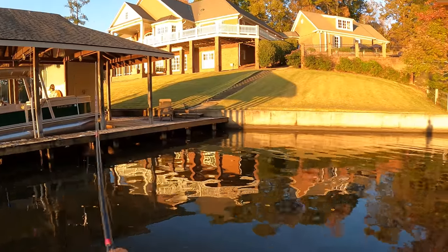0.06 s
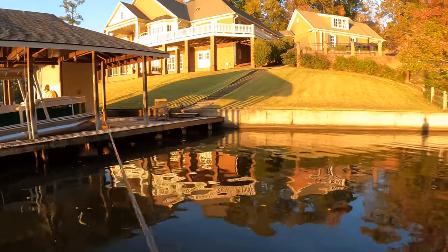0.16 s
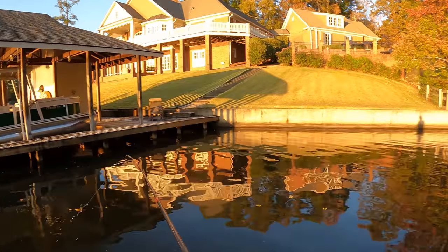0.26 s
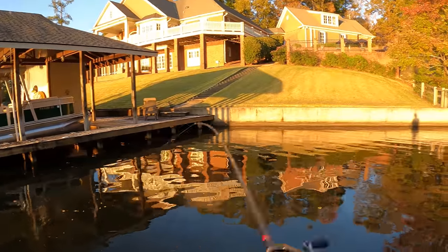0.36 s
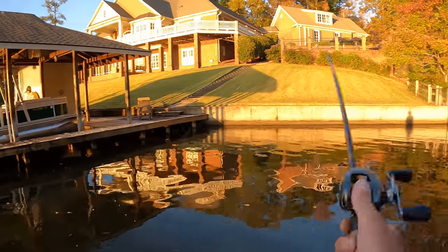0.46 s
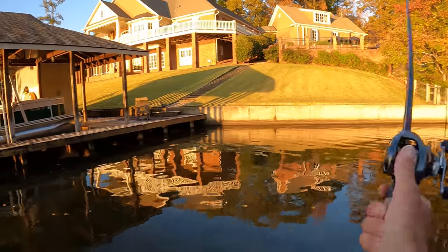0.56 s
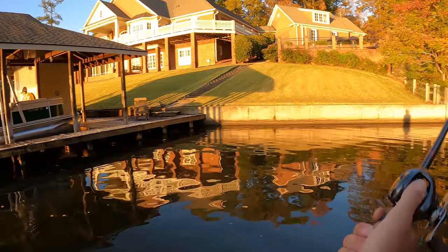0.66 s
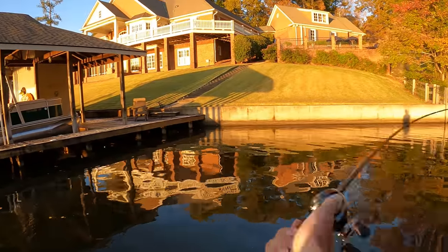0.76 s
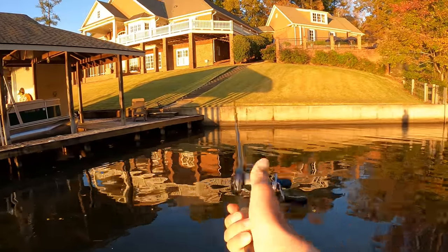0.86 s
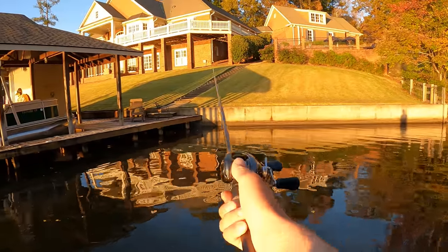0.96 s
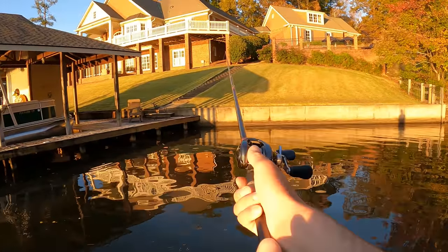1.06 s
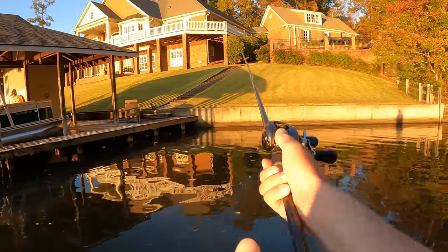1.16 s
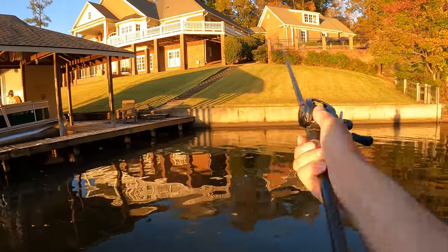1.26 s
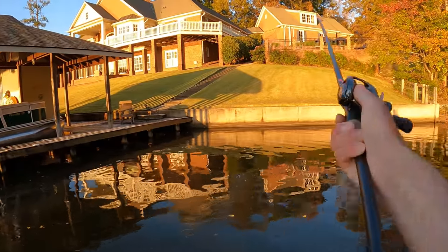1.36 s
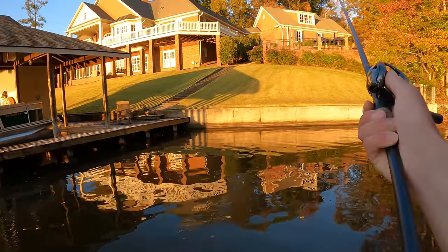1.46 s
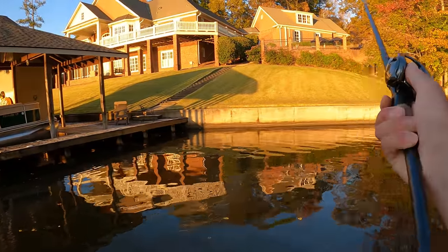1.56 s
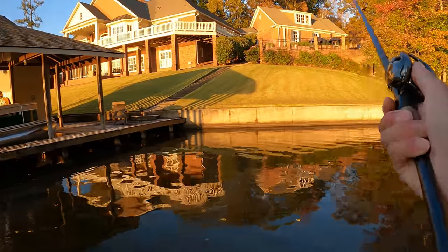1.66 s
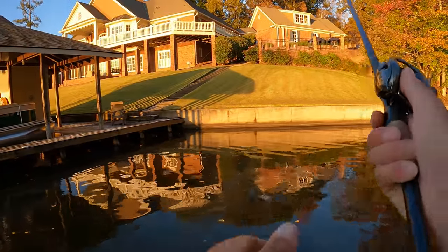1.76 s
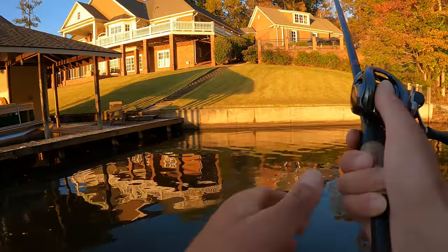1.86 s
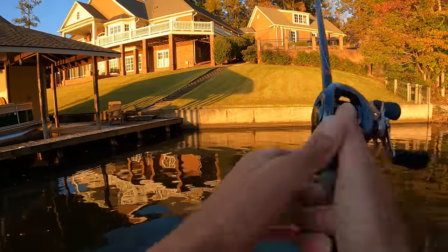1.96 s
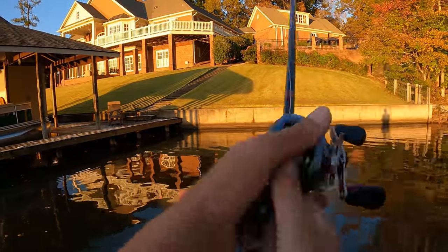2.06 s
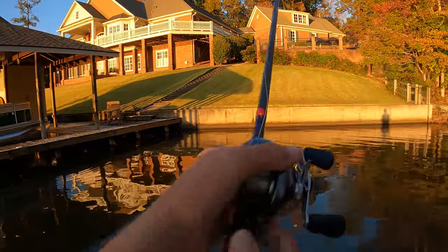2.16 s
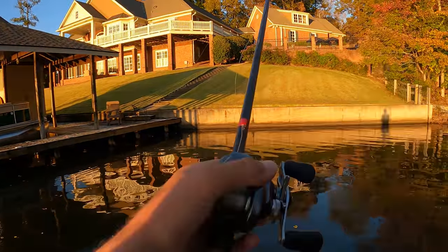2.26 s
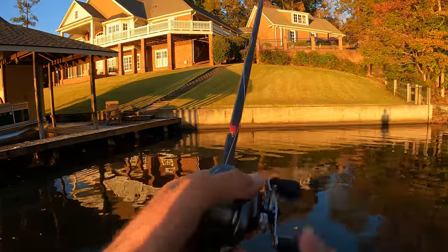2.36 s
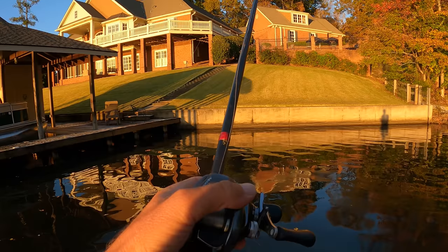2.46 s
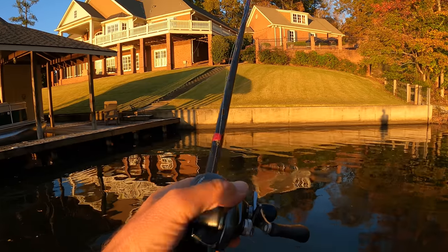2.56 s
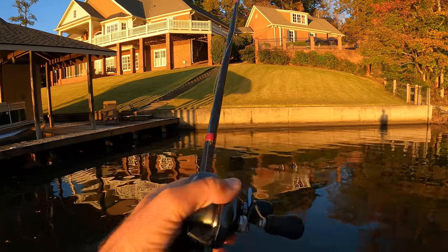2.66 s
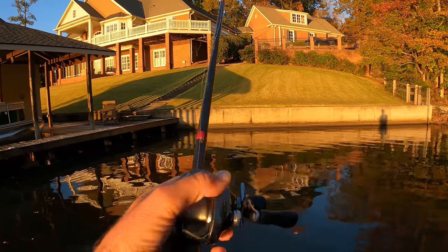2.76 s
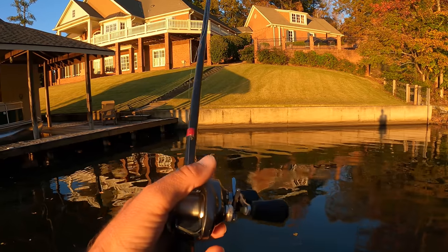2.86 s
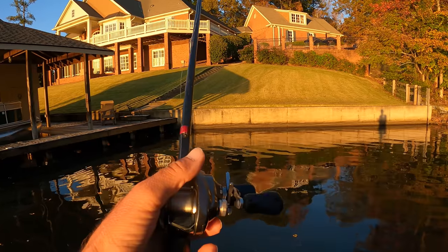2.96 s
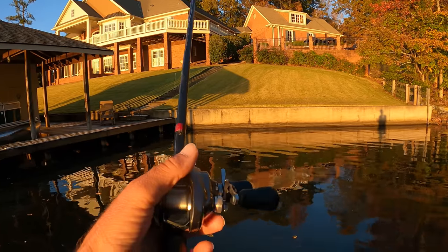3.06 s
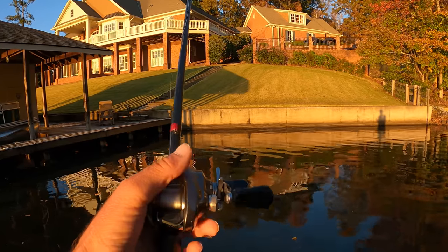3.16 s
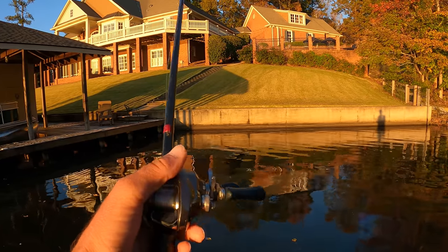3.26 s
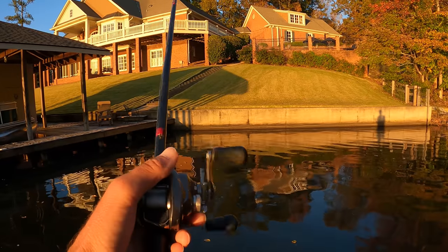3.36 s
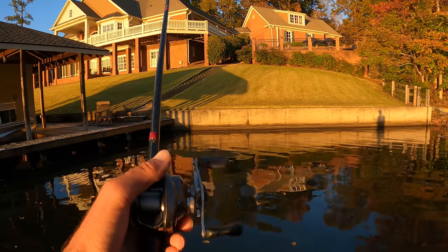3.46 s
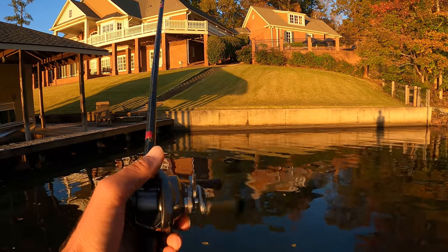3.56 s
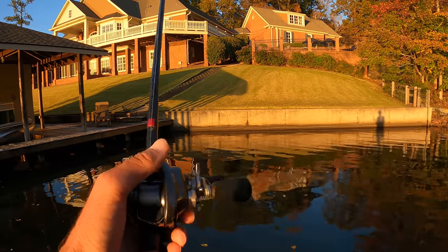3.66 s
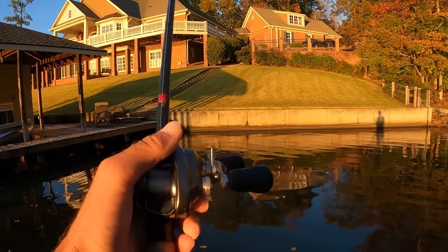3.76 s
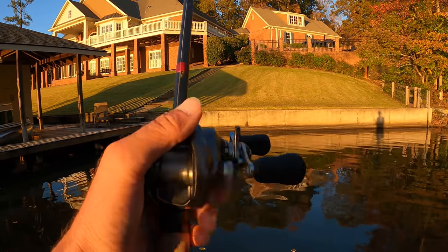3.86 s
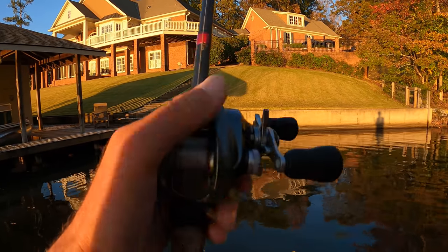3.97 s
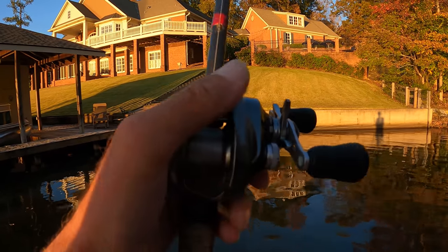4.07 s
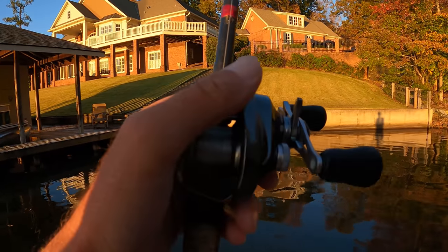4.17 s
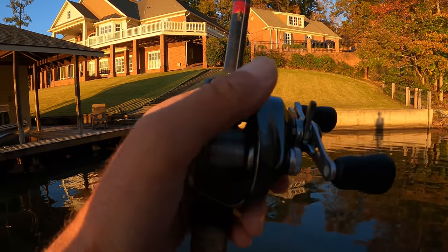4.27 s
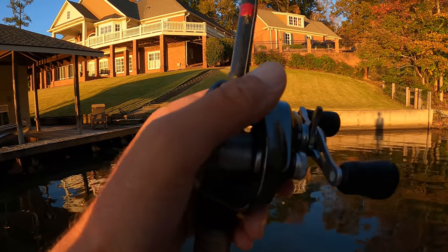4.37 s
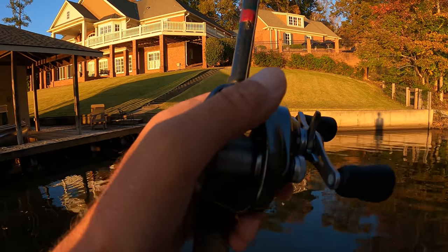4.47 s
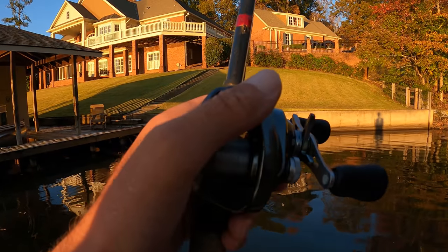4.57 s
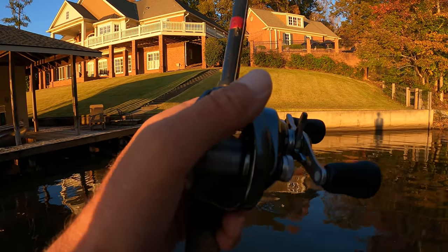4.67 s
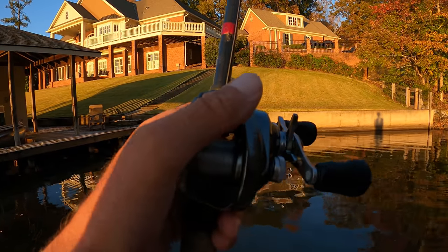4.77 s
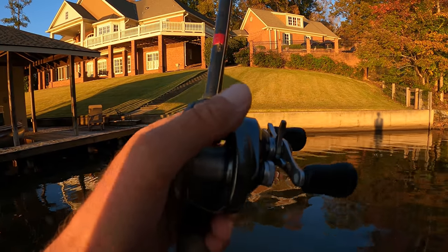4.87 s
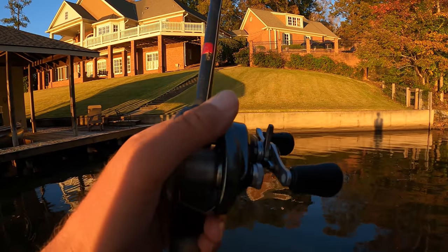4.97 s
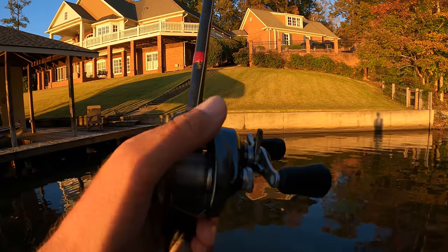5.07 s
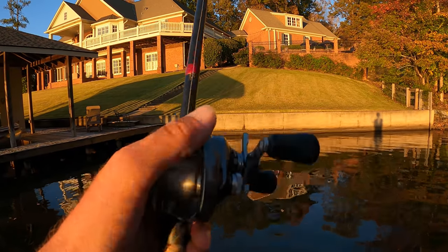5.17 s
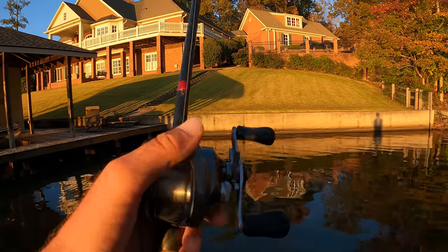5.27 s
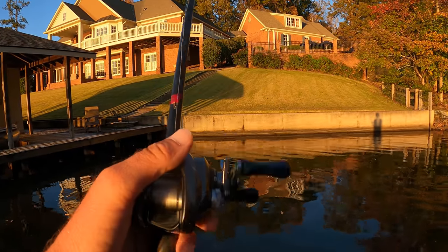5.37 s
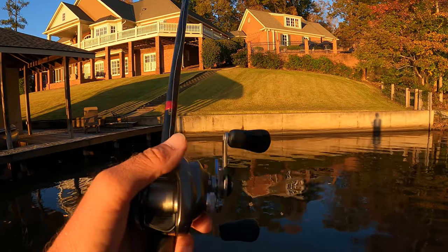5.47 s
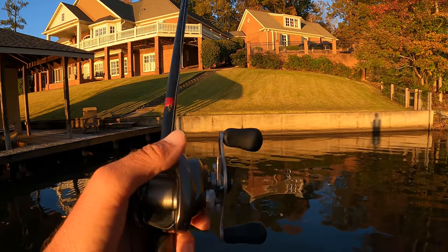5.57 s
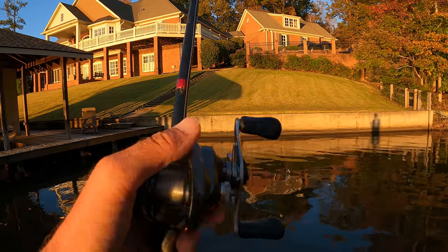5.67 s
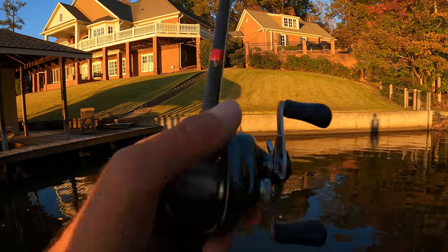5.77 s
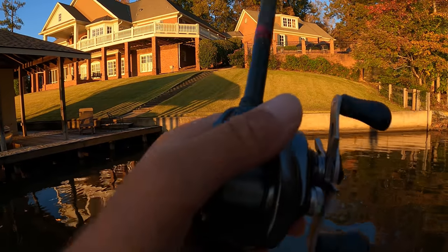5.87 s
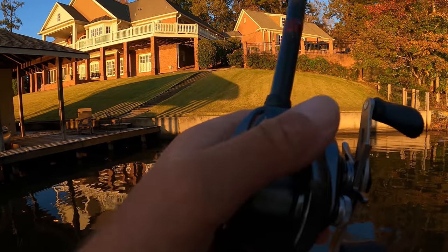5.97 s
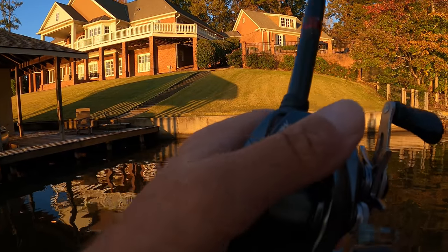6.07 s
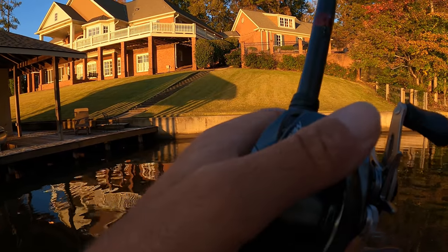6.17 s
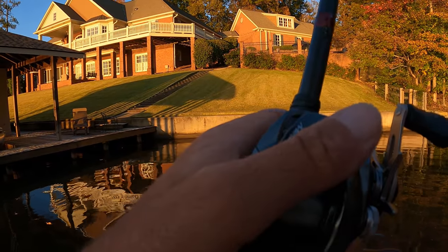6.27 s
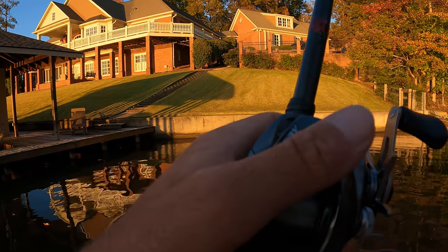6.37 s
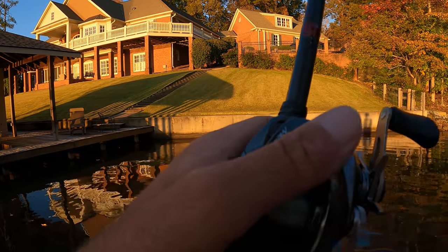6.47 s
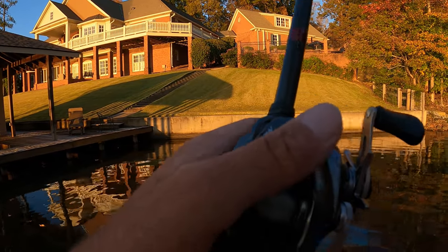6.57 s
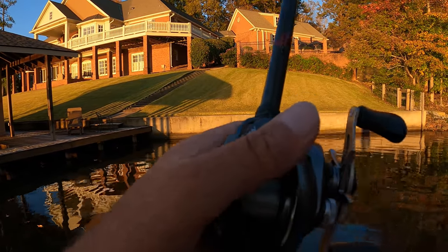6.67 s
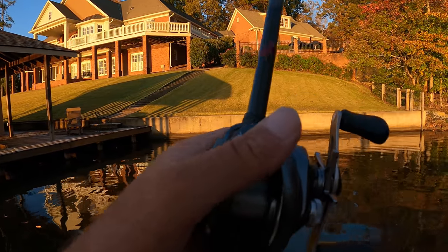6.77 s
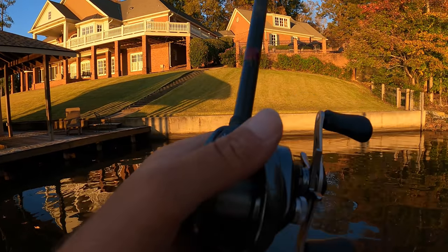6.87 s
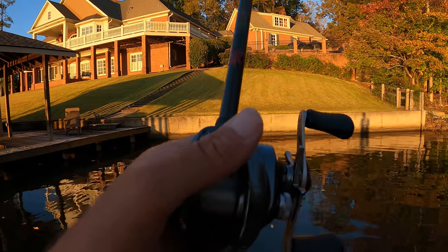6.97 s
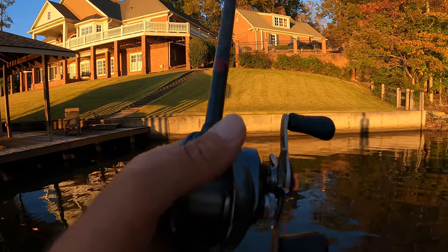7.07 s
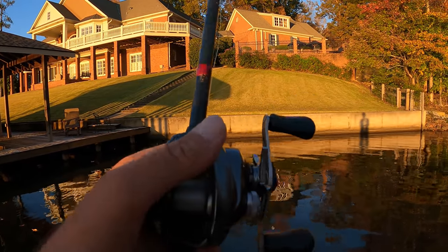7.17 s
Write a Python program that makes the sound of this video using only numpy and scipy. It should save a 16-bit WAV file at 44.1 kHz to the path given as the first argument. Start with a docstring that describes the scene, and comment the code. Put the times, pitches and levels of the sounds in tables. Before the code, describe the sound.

A fishing cast at close range: arm thuds, clack, bright whir falling in pitch, sharp reel click, then soft winding and dull bumps on quiet water.

```python
"""A cast with a baitcasting reel from a boat on a quiet cove, heard close by; air, water and crickets are shaped noise and tones.
Arm movements thud as low noise; then the thumb bar clacks as a burst of damped modes.
The spool whirs up and slows as harmonics of its turning, with rasp, whistles and the hiss of line.
The handle snaps the gears in: bursts of noise ring the frame, and the gears whir softly now and then.
Water laps under the hull, near crickets trill, and late bumps on the rod sound as dull damped resonances."""
import sys
import numpy as np
from scipy import signal
from scipy.fft import rfft, irfft, next_fast_len
from scipy.io import wavfile
from scipy.ndimage import uniform_filter1d, map_coordinates

SR = 44100
rng = np.random.default_rng(int(sys.argv[2]) if len(sys.argv) > 2 else 0)


def generate_wav(sig):
    """Save sig (samples, or channels by samples) to the path in sys.argv[1] as 16-bit PCM at SR."""
    pcm = np.round(np.clip(np.atleast_2d(sig).T, -1, 1) * 32767).astype(np.int16)
    wavfile.write(sys.argv[1], SR, pcm)


N = 318393
STROKE_DROP_DB = 12  # how far strokes, skid, sizzle and ticks lie below their peak at their ends


def amp(db):
    """Amplitude ratio of a level in decibels."""
    return 10 ** (np.asarray(db) / 20)


def unit(x):
    """Normalise to a root mean square of 1."""
    return x / np.sqrt(np.mean(x ** 2) + 1e-20)


def along(points, hz):
    """Interpolate (Hz, value) points on a logarithmic frequency axis."""
    f, v = np.transpose(points)
    return np.interp(np.log(hz + 1), np.log(f + 1), v)


def curves(rows):
    """Interpolate linearly in time: one value per sample for each column after the time."""
    s, *cols = np.transpose(rows)
    return [np.interp(np.arange(N) / SR, s, c) for c in cols]


def swells(rows, fade=0.04):
    """Envelope for each dB column, fading to silence outside the table's times."""
    t = np.arange(N) / SR
    gate = np.clip(1 + np.minimum(t - rows[0][0], rows[-1][0] - t) / fade, 0, 1)
    return gate * amp(curves(rows))


def swell(s, db, rise_s, fall_s, drop_db, fade=.04, tail_s=0):
    """Exponential growth to a peak at s and decay after it; drop_db lower at either end, it fades out."""
    t = np.arange(N) / SR - s
    gate = np.clip(1 + np.minimum((t + rise_s) / fade, (fall_s - t) / (fade + tail_s)), 0, 1)
    return gate * amp(db - drop_db * np.abs(t / np.where(t < 0, rise_s, fall_s)))


def wobble(rate):
    """Slow random modulation: a smooth curve through rate random knots a second."""
    knots = rng.standard_normal(int(N * rate / SR) + 4)
    return map_coordinates(knots, [np.arange(N) * rate / SR])


def filtered(x, response):
    """Linear filtering: the spectrum of x times a response of frequency."""
    m = next_fast_len(N + 8192)
    return irfft(rfft(x, m) * response(np.fft.rfftfreq(m, 1 / SR)), m)[..., :N]


def band(x, lo_hz, hi_hz, order=2):
    """Causal band-pass resonance without ripple."""
    sections = signal.butter(order, [lo_hz, min(hi_hz, SR * .45)], 'band', fs=SR, output='sos')
    return signal.sosfilt(sections, x)


def rush(spectrum):
    """Partly coherent stereo noise of rms 1: a shared middle and an independent side set the likeness."""
    # Each row: frequency in Hz, correlation of left and right from 0 to 1.
    likeness = [(50, 1), (150, 0.9), (400, 0.53), (1500, 0.54), (12000, 0.67)]

    def mid_side(hz):
        angle = np.arccos(np.clip(along(likeness, hz), -1, 1)) / 2
        return amp(along(spectrum, hz)) * [np.cos(angle), np.sin(angle)]

    mid, side = filtered(rng.standard_normal((2, N)), mid_side)
    return unit(np.array([mid + side, mid - side]))


def blow(x):
    """Scale a transient to the energy of two milliseconds at rms 1."""
    return x / np.sqrt(np.sum(x ** 2) / (.002 * SR))


def add(track, s, x):
    """Superpose x on the track from time s."""
    part = track[round(s * SR):][:len(x)]
    part += x[:len(part)]


def modes(table, t, scatter_db):
    """Modal decay: damped sines that share the energy of every blow a little differently."""
    total = 0
    for hz, level, t60 in table:
        decay = amp(level + rng.normal(0, scatter_db) - 60 * t / t60)
        total = total + decay * np.sin(2 * np.pi * hz * t)
    return total


def rotor(rate_hz, spectrum, odd_db, flutter_db, shake, count):
    """Harmonics of a turning part glide through fixed resonances; shake (radians) blurs the high ones."""
    phase = 2 * np.pi * np.cumsum(rate_hz) / SR + shake * wobble(200)[:len(rate_hz)]
    t = np.arange(len(rate_hz)) / SR
    tone = 0
    for k in range(2, count):
        flutter = np.interp(t, np.arange(64) / 20, rng.standard_normal(64))
        gain = amp(along(spectrum, k * rate_hz) + odd_db * (k % 2))
        tone = tone + gain * amp(flutter_db * flutter) * np.sin(k * phase + rng.uniform(0, 2 * np.pi))
    return unit(tone)


def whistle(speed, rows, shake):
    """Order tones: single multiples of the rotation sing for a moment; shake (radians) roughens them."""
    phase = 2 * np.pi * np.cumsum(speed) / SR + shake * wobble(110)
    t, flutter = np.arange(N) / SR, amp(4 * wobble(55))
    song = 0
    for start, end, order, db in rows:
        gate = np.clip(np.minimum(t - start, end - t) / .03, 0, 1)
        song = song + amp(db) * gate * np.sin(order * phase)
    return np.sqrt(2) * flutter * song


def cove():
    """Broadband outdoor air, and a narrow low resonance of the hull excited by lapping water."""
    # Still air. Each row: frequency in Hz, relative level in dB per Hz.
    air_spectrum = [(29, -44.5), (50, -24.5), (91, -3), (124, -12), (162, -13.5), (400, -22.5), (841, -39),
                    (1130, -29), (3300, -45.5), (5000, -100)]
    # The strongest laps under the hull. Each row: peak time in seconds, level in dB.
    lap_rows = [(4.171, -43), (4.6, -48), (4.97, -51), (5.17, -45), (5.55, -45)]
    hum = rush([(55, -36.5), (80, 13), (90, 9.0), (115, -11.5), (200, -64.5)])
    laps = sum(swell(s, db, rise_s=0.052, fall_s=0.044, drop_db=9.5) for s, db in lap_rows)
    ripples = amp(-63.5 + 2 * wobble(9.3))  # small waves between the laps
    air = amp(-57.0) * rush(air_spectrum) * amp(0.41 * wobble(3.7))
    return air + np.hypot(laps, ripples) * hum


def crickets():
    """Wing strokes modulate a tone in amplitude and frequency; near trills stand over a far chorus of noise."""
    # Far insects. Each row: frequency in Hz, relative level in dB per Hz.
    chorus_spectrum = [(2500, -40), (3500, -17), (4000, -3.5), (4350, 2), (4700, -12), (5300, -22),
                       (7200, -23.5), (8500, -32), (12000, -45.5), (15000, -72)]
    # Near trills. Each row: start in seconds, end in seconds, pitch in Hz, level in dB.
    trill_rows = [(2.158, 2.525, 4400, -62.5), (2.601, 3.016, 4115, -65.5), (2.994, 3.396, 4370, -68),
                  (3.43, 3.896, 4326, -60), (3.549, 4.142, 4045, -66.5), (4.421, 4.781, 4277, -62),
                  (4.954, 5.407, 4094, -67.5), (5.582, 6.04, 4280, -56.5), (6.293, 7.105, 4420, -61)]
    out = amp(-63.5) * rush(chorus_spectrum) * amp(0.27 * wobble(12.0))
    drift, grit, size = wobble(9.1), wobble(300), wobble(25)
    for start, end, hz, db in trill_rows:
        i = np.arange(round(start * SR), min(round(end * SR), N))
        strokes_per_s = 40 * (1 + 0.041 * drift[i])
        stroke = 2 * np.pi * np.cumsum(strokes_per_s) / SR + rng.uniform(0, 2 * np.pi)
        pitch = hz + 25 * drift[i] + 60 * np.sin(stroke) + 70 * grit[i]  # swings with each stroke
        carrier = np.sin(2 * np.pi * np.cumsum(pitch) / SR)
        trill = unit(carrier * amp(3.2 * np.cos(stroke) + 2.1 * size[i]))
        out[:, i] += amp(db) * trill * signal.windows.tukey(len(i), .5)
    return out


def handling():
    """Pressure of moving air thuds on the microphone as low noise, and the hands rumble through the rod."""
    # Air on the microphone. Each row: frequency in Hz, relative level in dB per Hz.
    rumble_spectrum = [(12, -33.5), (21, 0), (54, 8.5), (118, -16), (221, -27), (300, -32.5), (480, -120)]
    # Hands on the rod. Each row: frequency in Hz, relative level in dB per Hz.
    grip_spectrum = [(47, -24.5), (80, 5.5), (154, 1), (517, -11), (1200, -17.5), (3000, -30), (3900, -37),
                     (6600, -120)]
    # Arm movements pushing air. Each row: peak time in seconds, relative level in dB, rise and fall in seconds.
    buffet_rows = [(.04, -37.5, 0.13, 0.061), (.19, -25.5, 0.17, 0.17), (.44, -32.5, 0.041, 0.057),
                   (.83, -41.5, 0.088, 0.12), (1.359, -40.5, 0.21, 0.25), (2.26, -39.5, 0.06, 0.08),
                   (2.53, -48.5, 0.095, .06), (7.03, -39, 0.1, 0.055), (7.21, -37, 0.076, 0.086)]
    # Hands shifting on the rod. Each row: peak time in seconds, relative level in dB, rise and fall in seconds.
    grip_rows = [(.925, -44.5, 0.073, 0.056), (1.38, -57, 0.08, 0.59), (2.2, -58.5, 0.29, 0.46),
                 (2.502, -52.5, 0.085, 0.17), (4.6, -65.5, 0.19, 0.7), (5.37, -59.5, 0.033, 0.13),
                 (6.45, -61, 0.026, 0.1), (6.88, -51.5, 0.076, 0.19), (7.2, -50, 0.38, 0.093)]
    drop_db = 12.5
    breeze = amp(-59.5)  # relative, like the buffets: air between the movements
    push = breeze + sum(swell(*row, drop_db) for row in buffet_rows)
    buffet = push * rush(rumble_spectrum) * amp([[-2.2], [2.2]])  # stronger on the right
    uneven = unit(rush(grip_spectrum) * amp(2.2 * wobble(60)))
    grip = sum(swell(*row, drop_db) for row in grip_rows) * uneven
    return amp(-0.5) * buffet + amp(6.5) * grip


def rubbing():
    """Sliding friction of line, sleeve and hand: grainy noise, with a band in which taut line rings the guides."""
    # Each row: frequency in Hz, relative level in dB per Hz.
    rub_spectrum = [(350, -35), (720, -9.5), (1150, 0), (1560, -11), (1960, -7.5), (3060, -5.5),
                    (4770, -5.5), (6960, -10), (12800, -29), (15000, -43.5)]
    # Strokes. Each row: peak time in seconds, relative level in dB, rise and fall in seconds,
    # treble gain in dB, guide ring in dB relative to the grain in its band.
    stroke_rows = [(.09, -59, 0.19, 0.24, 8, 5.5), (.23, -61.5, 0.02, 0.022, 14, 12.5),
                   (.4, -64.5, 0.4, 0.11, -6, -11), (0.688, -57.5, 0.23, 0.49, 1, -8.5),
                   (2.127, -58.5, 0.071, 0.12, 1, -17), (2.563, -64, 0.0088, 0.128, 0.5, -1.5),
                   (2.962, -74.5, 0.045, 0.17, 8.5, -10), (3.425, -67, 0.053, 0.29, 1.5, -7),
                   (5.279, -55.5, 0.057, 0.31, -6, -18)]
    treble_hz = 7300
    grain = unit(rush(rub_spectrum) * amp(1.1 * wobble(400) + 1.6 * wobble(40)))
    treble = filtered(grain, lambda hz: hz ** 4 / (hz ** 4 + treble_hz ** 4))
    ring = band(grain, 1890, 2320, order=1)
    strokes = 0
    for s, db, rise_s, fall_s, treble_db, ring_db in stroke_rows:
        colour = grain + (amp(treble_db) - 1) * treble + amp(ring_db) * ring
        strokes = strokes + swell(s, db, rise_s, fall_s, STROKE_DROP_DB, tail_s=fall_s / 2) * colour
    return amp(8.0) * strokes


def knocks():
    """Soft impact: a damped resonance, a hollow thud around it, the seat's clack and the rod's after-ring."""
    # Dull bumps on rod and hull. Each row: time in seconds, level in dB, pitch in Hz,
    # then clack and thud in dB relative to that level.
    knock_rows = [(0.914, -31.5, 219, -30, -8), (2.664, -52.5, 960, -16, -1), (3.003, -42.5, 550, -17, 1),
                  (4.527, -52, 600, -14, 2), (4.574, -56, 960, -18, -2), (4.626, -52, 912, -16, 1),
                  (6.825, -39.5, 1050, -6, 2), (6.842, -29, 998, -4, -2), (6.857, -30.5, 137, -28, -2),
                  (6.863, -39.5, 700, -18, -3), (6.8805, -24, 502, -28, -12.5), (6.894, -44.5, 1140, -9, 0),
                  (7.14, -27.5, 954, -12, -2), (7.172, -36, 900, -13, 6.5)]
    # Low modes of rod and reel seat. Each row: frequency in Hz, relative level in dB, 60 dB decay time in seconds.
    rod_modes = [(301, -6, .8), (393, 0, .42), (500, -9, .2)]
    # Bright modes of the reel seat. Each row: frequency in Hz, relative level in dB, 60 dB decay time in seconds.
    seat_modes = [(1703, 3.5, 0.04), (2060, 3, 0.018), (2350, -5, 0.024), (3370, -1, 0.029),
                  (3770, 4, 0.02), (4870, 8.5, 0.018)]
    # Bar and gears set the rod ringing. Each row: time in seconds, level in dB.
    jolt_rows = [(.353, -43), (2.511, -36)]
    out, t = np.zeros(N), np.arange(SR // 2) / SR
    rise = 1 - np.exp(-t / 0.003)  # a soft contact

    def rod():
        """Modal after-ring of the rod."""
        return blow(rise * modes(rod_modes, t, scatter_db=1.4))

    for s, db, hz, clack_db, thud_db in knock_rows:
        tone = np.sin(2 * np.pi * hz * t) * rise * amp(-60 * t / 0.025)
        force = rng.standard_normal(len(t)) * rise * (amp(-60 * t / 0.017) + amp(-18.0 - 60 * t / 0.16))
        thud = band(force, hz * 0.25, hz * 1.98, order=3)
        seat = blow(rise * modes(seat_modes, t, scatter_db=6))
        clack = seat + amp(-4.5) * blow(band(force, 1600, 6200, order=4))
        bump = blow(tone) + amp(thud_db) * blow(thud) + amp(clack_db) * clack + amp(-18) * rod()
        add(out, s, amp(db) * bump)
    for s, db in jolt_rows:
        add(out, s, amp(db) * rod())
    return out


def winding():
    """Gear meshing gives harmonics of the tooth rate that waver with uneven speed; damp line sizzles in the guides."""
    # Spells of whirring. Each row: peak time in seconds, level in dB, rise and fall in seconds,
    # grind in dB relative to that level.
    spell_rows = [(2.27, -58, .22, .38, -6), (5.86, -59, 0.3, 0.22, 2), (7.19, -47, .12, .1, -4.5)]
    # Each row: frequency in Hz, relative level in dB (per Hz for the grind).
    gear_spectrum = [(200, -21), (410, 4.5), (550, 4.5), (720, -3.5), (1020, 5.5), (1350, -14.5),
                     (1700, -12), (2050, -9.5), (3000, -35.5)]
    # Uneven gear speed. Each row: time in seconds, teeth per second (smoothed below).
    gear_speed = [(2.08, 112), (2.15, 123), (2.22, 106), (2.29, 122), (2.38, 112), (5.5, 130), (5.59, 138),
                  (5.655, 110), (5.73, 126), (5.78, 128), (5.84, 108), (5.96, 138), (6.01, 118),
                  (6.17, 137), (6.93, 96), (7.12, 109), (7.22, 106)]
    # Singing orders of the teeth. Each row: start in seconds, end in seconds, order, level in dB.
    whine_rows = [(2.11, 2.27, 9, -65), (2.13, 2.45, 5, -62), (2.15, 2.44, 8, -63.5), (5.47, 6.07, 8, -64),
                  (5.61, 5.73, 9, -63.5), (5.79, 6.02, 7, -64.5), (6.03, 6.19, 8, -61),
                  (5.96, 6.18, 15, -78)]
    out, grind = np.zeros((2, N)), rush(gear_spectrum)
    speed = uniform_filter1d(curves(gear_speed)[0], size=SR // 40)
    for s, db, rise_s, fall_s, grind_db in spell_rows:
        level = swell(s, db, rise_s, fall_s, drop_db=4)  # fairly even
        live = level > 0
        whir = rotor(speed[live], gear_spectrum, odd_db=-1, flutter_db=3, shake=.045, count=22)
        out[:, live] += level[live] * whir
        out += swell(s, db + grind_db, rise_s, fall_s, drop_db=11.5) * grind  # gathers mid-spell
    whine = whistle(speed, whine_rows, shake=.09)
    thread = rush([(5000, -11.0), (6300, -8), (7000, -2.5), (8000, -18.0), (9200, -18), (13000, -44.0)])
    sizzle = swell(5.87, -65, rise_s=.2, fall_s=.2, drop_db=STROKE_DROP_DB) * thread
    return out + whine + sizzle


def clicks():
    """Hard impact of clutch and pinion: a broadband crack, a short rattle and the modal ring of the frame."""
    # Sharp contacts. Each row: time in seconds, relative level of the snap in dB,
    # then body, edge, and rattle and ring in dB (the ring also follows the body).
    click_rows = [(0.321, -52, 3, -7, 1), (0.427, -56, 6, -21, 0), (0.7701, -37, -12.5, 5, -2),
                  (2.086, -42.5, -10, -8.5, 3.5), (2.126, -35, -12, -11.5, 1), (2.4394, -37.5, -7.5, -3, 5),
                  (2.461, -29.5, -12.5, -3.5, 8), (2.4652, -32, -10, -6.5, 8.5),
                  (2.4889, -21.5, -12.5, -5, -4), (2.495, -35, -6, -3, 5.5), (2.509, -13, -9, -2.5, 2),
                  (3.993, -57, -7, -5, 0), (6.782, -40.5, -5, -27, -2), (6.805, -49.5, -3, -5, 4.5),
                  (6.843, -43.5, -13, -3, 15)]
    # Reel modes. Each row: frequency in Hz, relative level in dB, 60 dB decay time in seconds.
    frame_modes = [(960, -19, .12), (1085, 0, .055), (1260, -4, .035), (1960, -11, .03), (2460, 1, .025),
                   (2830, 0, .025), (3230, -1, .035), (7800, -7, .03)]
    out, t = np.zeros((2, N)), np.arange(SR // 5) / SR
    rattle_decay = amp(-10.0 - 60 * t / 0.029) + amp(-56 - 60 * t / 0.2015)
    for s, db, body_db, edge_db, ring_db in click_rows:
        crack = rng.standard_normal(len(t)) * amp(-60 * t / .0075)
        crack[0] += 3  # the first hard contact
        ring = blow(modes(frame_modes, t, scatter_db=6.5))
        shared = rng.standard_normal(len(t))
        for port in out:  # part of the rattle scatters differently to each port
            scatter = shared + amp(-6) * rng.standard_normal(len(t))
            force = crack + amp(ring_db) * scatter * rattle_decay
            snap = amp(body_db) * blow(band(force, 1000, 2200))
            snap += blow(band(force, 3150, 4250))
            snap += amp(edge_db) * blow(band(force, 5280, 8700, order=3))
            snap += amp(edge_db - 12.0) * blow(band(force, 10500, 12000))  # the glint of steel on steel
            add(port, s, amp(db) * (snap + amp(body_db + ring_db + 3.0) * ring))
    return amp(-0.5) * out


def thumb_bar():
    """Impulsive excitation of damped modes: the bar drops with a hollow clack and a thin after-ring."""
    # Each row: frequency in Hz, relative level in dB, 60 dB decay time in seconds.
    bar_modes = [(958, -23, .17), (1130, -23, .15), (1200, 1, .013), (1520, -1, .01), (1860, 1, .015),
                 (1970, -11, .04), (2650, -1, .009), (3140, -3, .02), (3900, 9, .009)]
    out, t = np.zeros(N), np.arange(SR // 4) / SR
    force = rng.standard_normal(len(t)) * (amp(-60 * t / .0045) + amp(-25 - 60 * t / .04))
    crack = band(force, 1500, 9500, order=4)
    ring = band(modes(bar_modes, t, scatter_db=1), 850, 8000)
    add(out, .3518, amp(-16) * (blow(ring) + amp(-6.5) * blow(crack)))  # crack relative to the ring
    return out


def flicks(speed):
    """Periodic impulses: as the spool is braked, a loose loop of line ticks on the frame once a turn."""
    turns = np.floor(np.cumsum(speed) / SR)
    ticks = np.diff(turns, prepend=0) * amp(4 * wobble(90))
    level = swell(1.43, -49, rise_s=.13, fall_s=.13, drop_db=STROKE_DROP_DB)
    return level * unit(band(ticks, 3200, 5800))


def spool():
    """Rotating friction: the spool brushes its brake twice a turn, giving buzz, pulsed rasp and hissing line."""
    # Flung up, coasting, then braked harder. Each row: time in seconds, turns per second.
    speed_rows = [(.86, 90), (.93, 135), (1.05, 131), (1.09, 127), (1.19, 114), (1.26, 107.8),
                  (1.325, 105.6), (1.4, 91), (1.53, 69), (2.0, 45)]
    # Each row: time in seconds, whir level in dB, relative level of the line hiss in dB.
    cast_rows = [(0.8, -63, -69), (0.862, -45, -49), (1.006, -36.5, -40.5), (1.048, -44, -58),
                 (1.078, -43, -46), (1.314, -40.5, -46.5), (1.47, -44, -65), (1.56, -51.5, -62.5),
                 (1.78, -61.5, -90), (1.87, -56.5, -80), (2.04, -71.5, -92)]
    # Spinning reel. Each row: frequency in Hz, relative level in dB (per Hz for the rasp).
    whir_spectrum = [(180, -31), (300, -10), (800, -7.5), (986, -0.5), (1550, -0.5), (2300, -5),
                     (4120, 1.5), (4920, -3.5), (11900, -23), (14000, -38)]
    # Each row: time in seconds, tonal share from 0 to 1.
    tonal_rows = [(.99, .06), (1.06, .62), (1.25, .68), (1.3, .45), (1.4, .3), (1.54, .06)]
    # The whistle jumps between orders of the spool. Each row: start in seconds, end in seconds, order, level in dB.
    whistle_rows = [(1.055, 1.195, 16, -52), (1.05, 1.19, 34, -54), (1.17, 1.34, 14, -49),
                    (1.19, 1.29, 38, -52), (1.315, 1.41, 16, -55), (1.385, 1.48, 18, -53)]
    whir, hiss = swells(cast_rows)
    speed, = curves(speed_rows)
    tonal, = curves(tonal_rows)
    buzz, live = np.zeros(N), whir > 0
    buzz[live] = rotor(speed[live], whir_spectrum, odd_db=-9, flutter_db=3, shake=.003, count=80)
    brush = 4 * np.pi * np.cumsum(speed) / SR  # phase of two brushes a turn
    # the rod blank carries the lowest orders
    hum = amp(-10.5 + 3 * wobble(20)) * np.sin(brush)
    hum += amp(-20 + 4 * wobble(20)) * np.sin(2 * brush)
    rasp = unit(rush(whir_spectrum) * amp(1.8 * np.cos(brush)))
    line = rush([(2000, -29), (5000, -4), (7000, 5), (10500, 2.5), (13000, 0.5), (15500, -26.5)])
    line = line * amp(2.7 * wobble(70))
    song = whistle(speed, whistle_rows, shake=.025)
    spin = np.sqrt(tonal) * buzz + tonal * hum + np.sqrt(1 - tonal) * rasp
    # the thumb stops the spool with a short skid
    skid = swell(2.14, -56, rise_s=.05, fall_s=.05, drop_db=STROKE_DROP_DB)
    return whir * spin + song + flicks(speed) + (hiss * amp(-6.0) + skid) * line


def scene():
    """Superposition: the near sources share a level difference between the ports; the surroundings do not."""
    # Each row: time in seconds, left minus right in dB.
    pan_rows = [(0, 1.5), (1.0, -1.5), (2.0, -1.5), (2.5, 1)]
    pan_db, = curves(pan_rows)
    near = spool() + rubbing() + handling() + winding() + thumb_bar() + clicks() + knocks()
    return near * amp(np.array([pan_db, -pan_db]) / 2) + crickets() + cove()


def record(dry):
    """Interaural-like phase: the right port leads slightly above the bass; a band limit cuts the top."""
    skew, top_hz = .6, 15700  # phase scale in radians, band limit in Hz

    def response(hz):
        lead = skew * hz / (hz + 300) / (1 + (hz / 9000) ** 2)
        phase = lead * np.array([[-1], [1]]) / 2
        return (hz < top_hz) * np.exp(1j * phase)

    return filtered(dry, response)


dry = scene()
out = record(dry)
generate_wav(out)
```